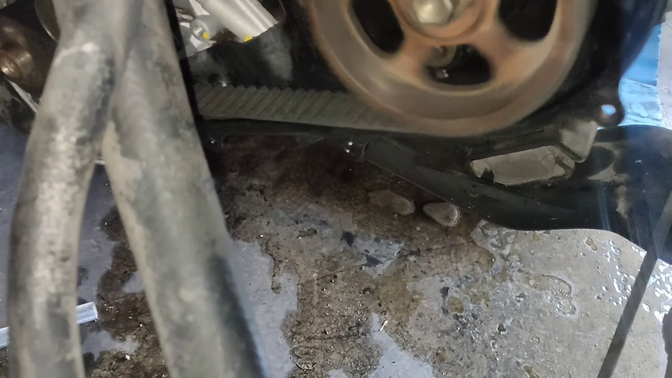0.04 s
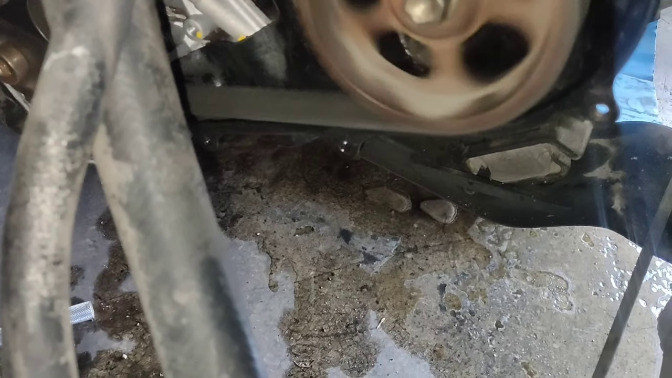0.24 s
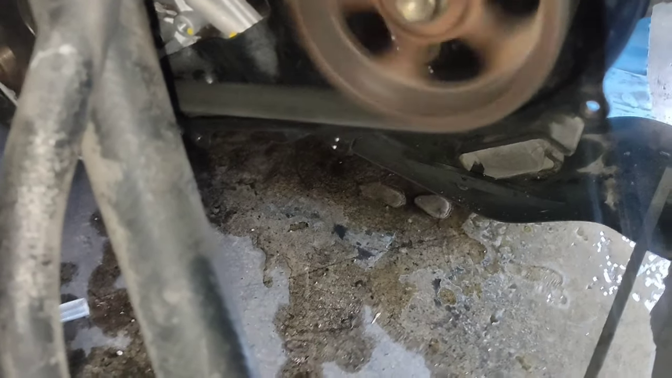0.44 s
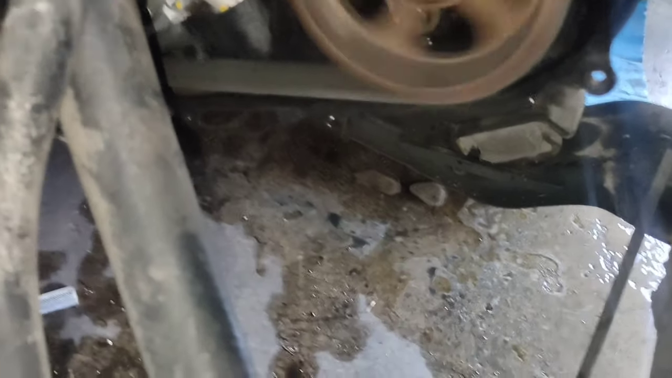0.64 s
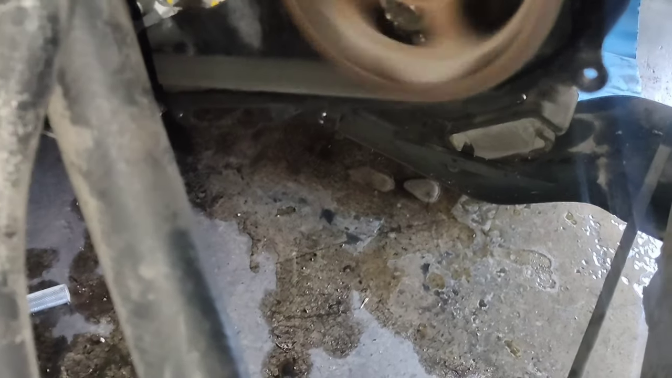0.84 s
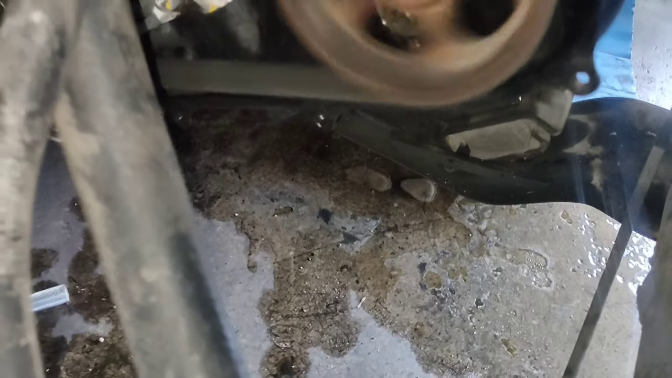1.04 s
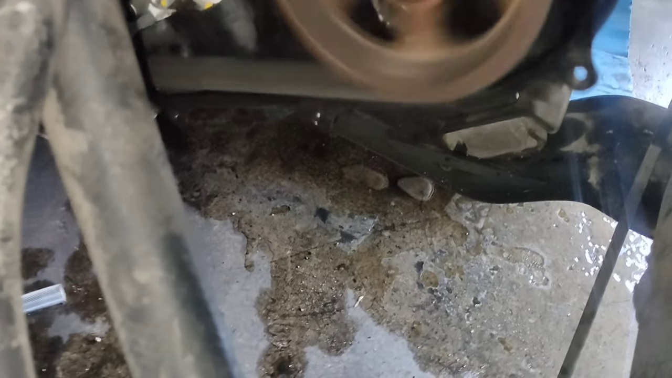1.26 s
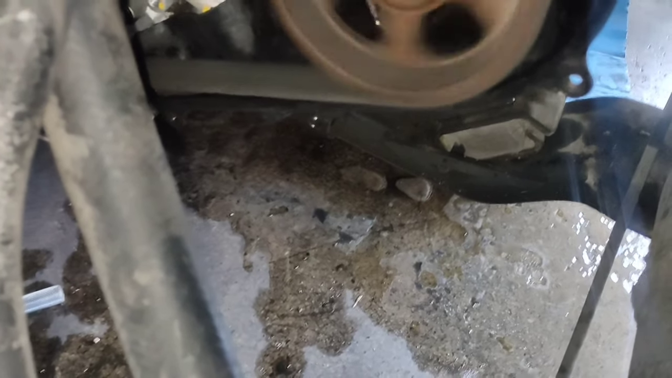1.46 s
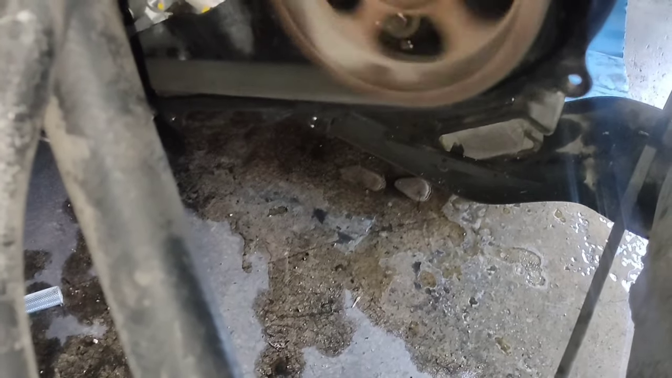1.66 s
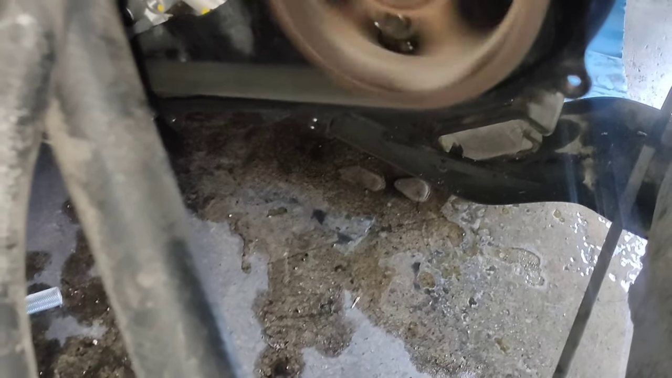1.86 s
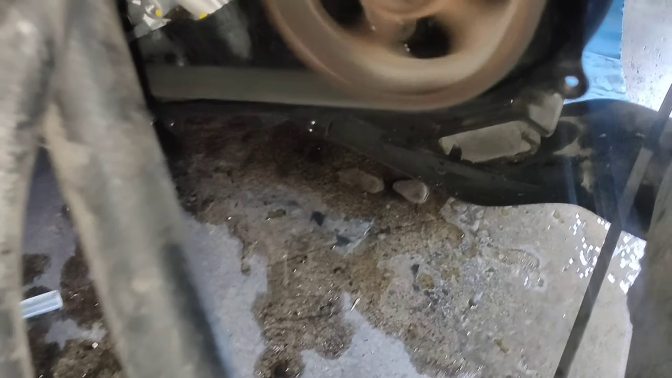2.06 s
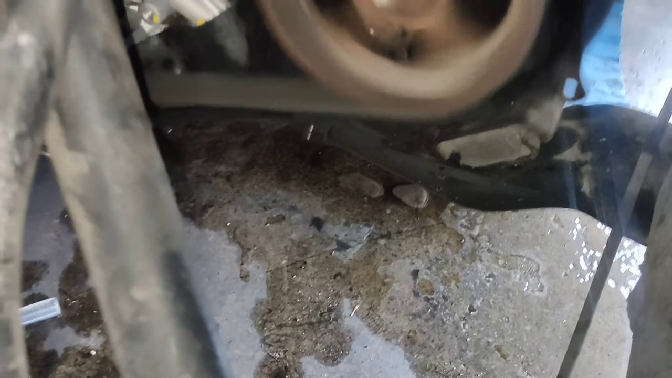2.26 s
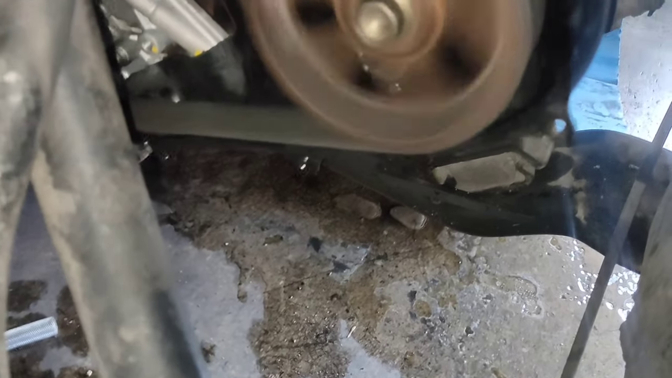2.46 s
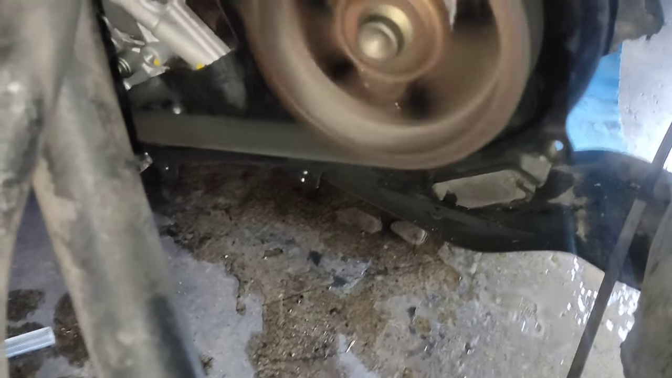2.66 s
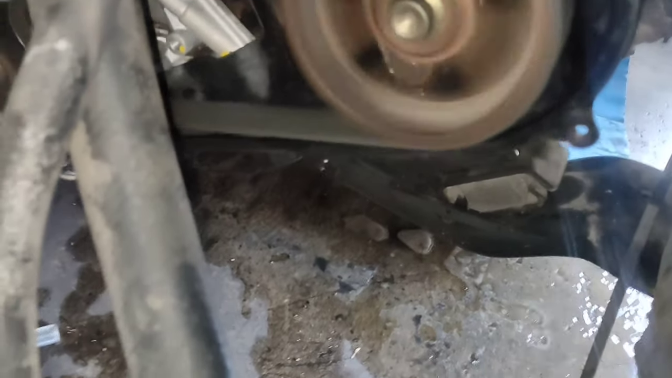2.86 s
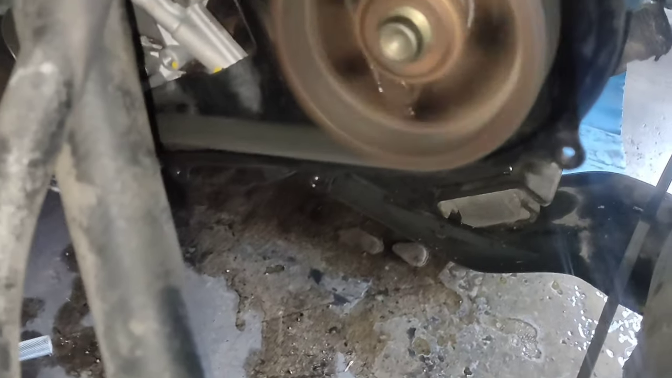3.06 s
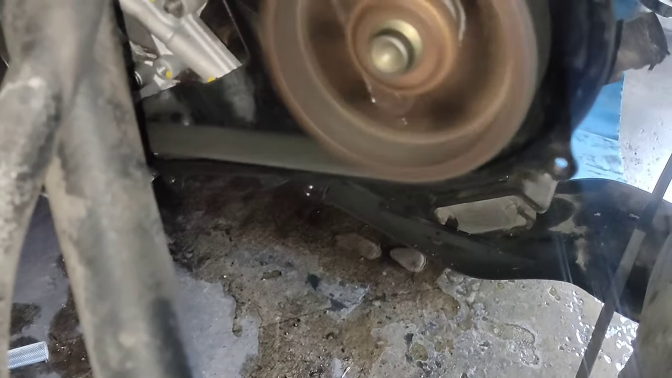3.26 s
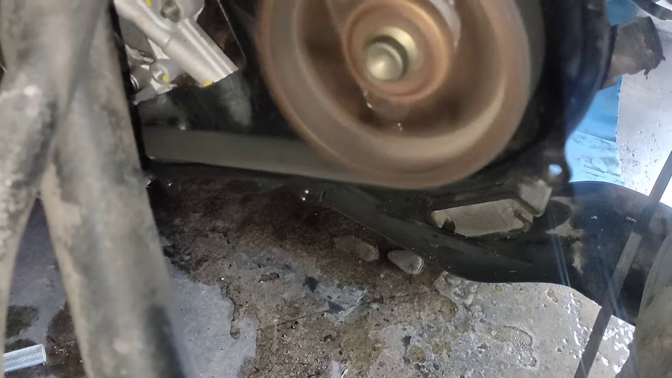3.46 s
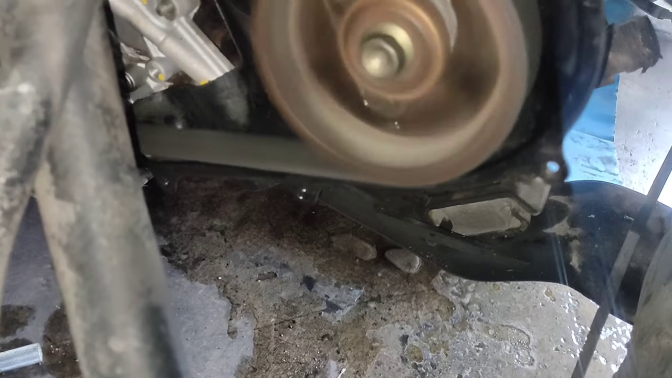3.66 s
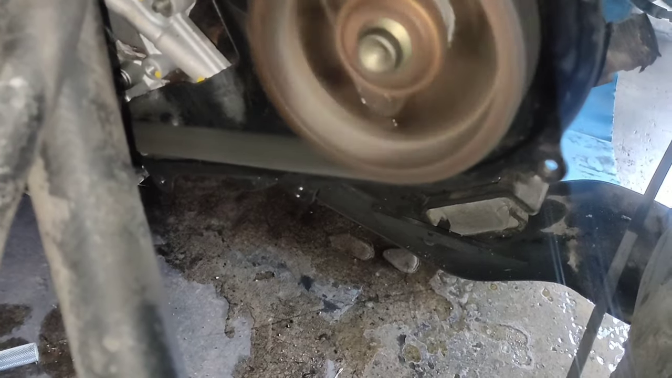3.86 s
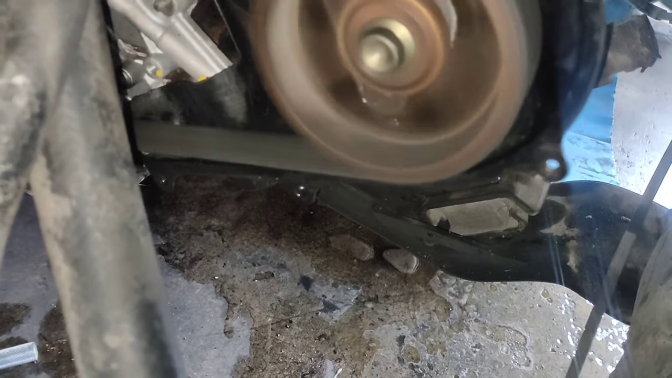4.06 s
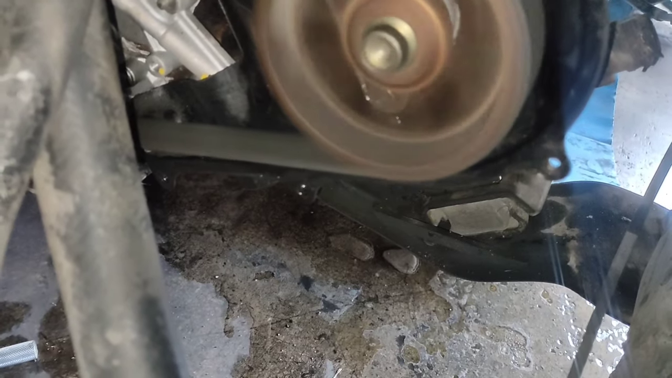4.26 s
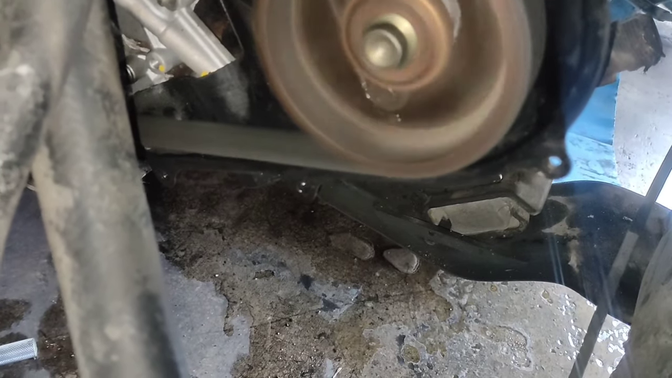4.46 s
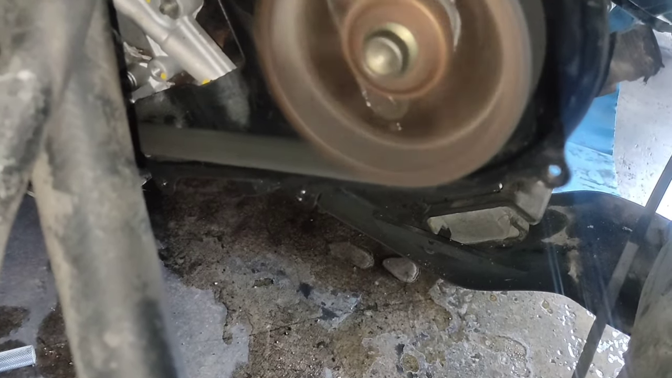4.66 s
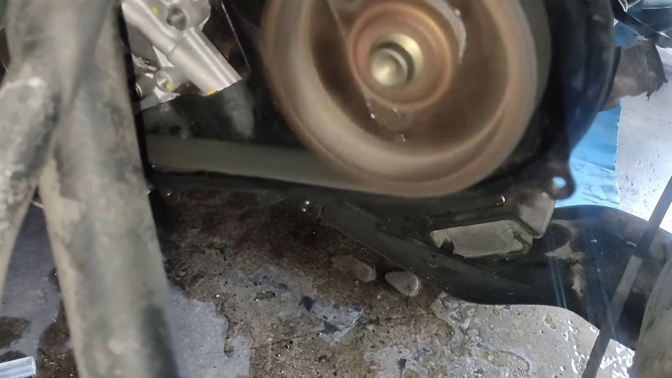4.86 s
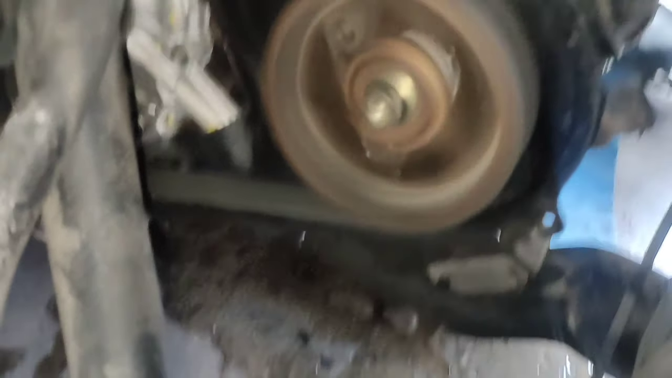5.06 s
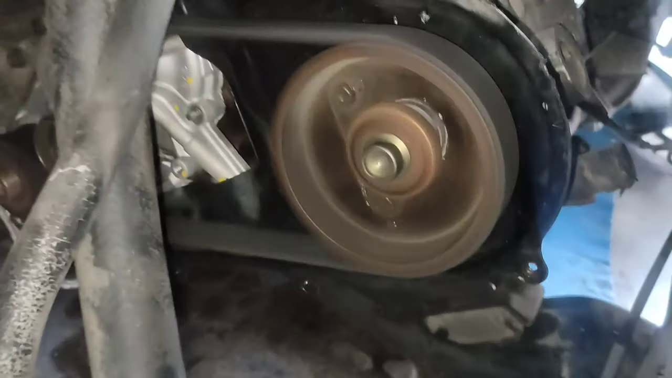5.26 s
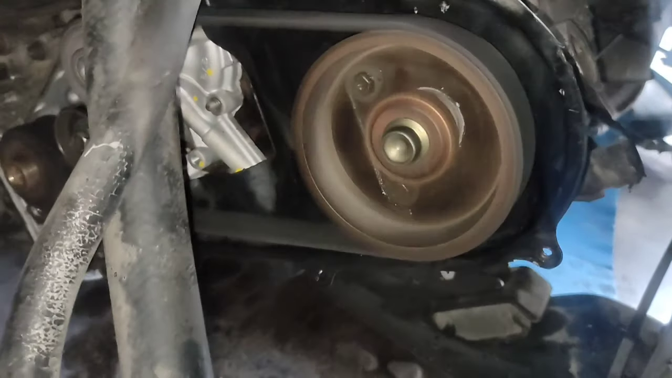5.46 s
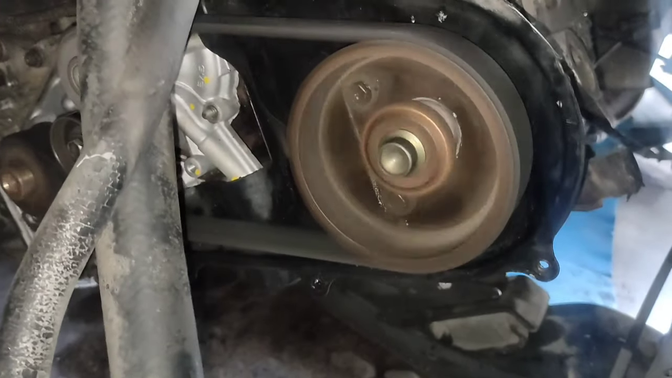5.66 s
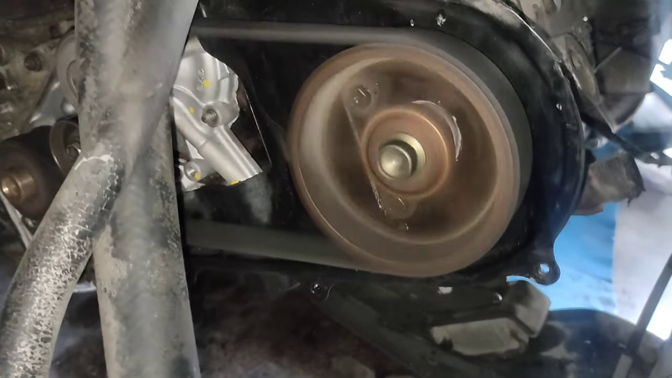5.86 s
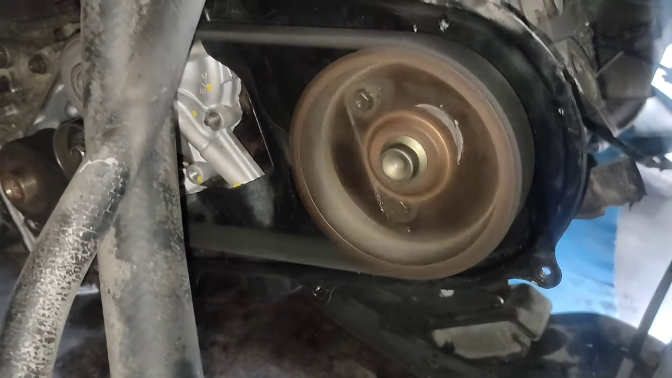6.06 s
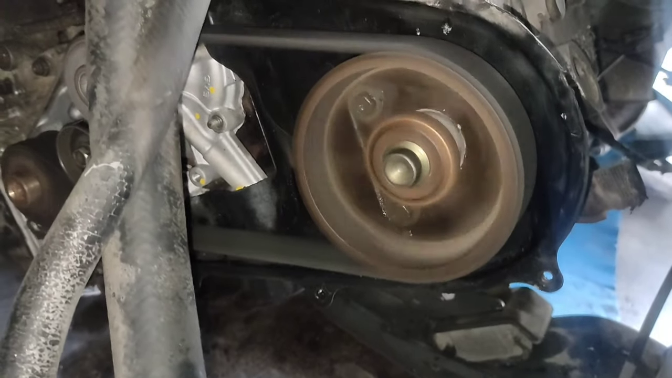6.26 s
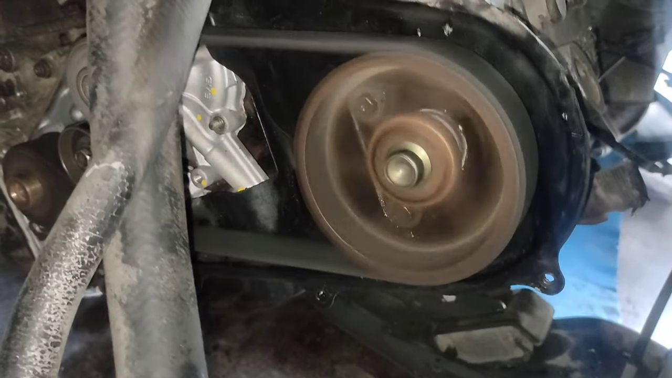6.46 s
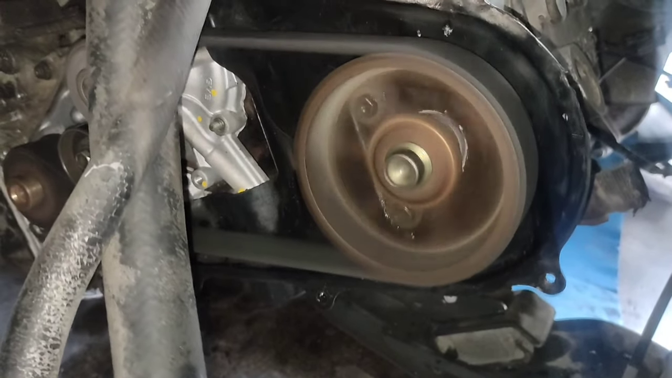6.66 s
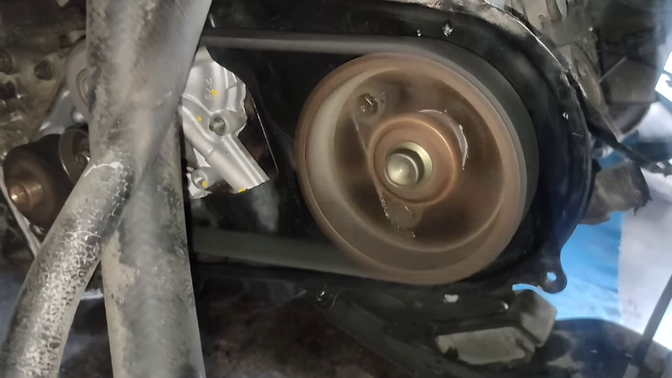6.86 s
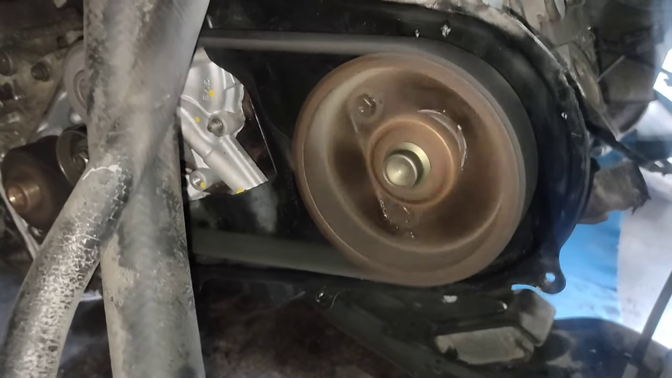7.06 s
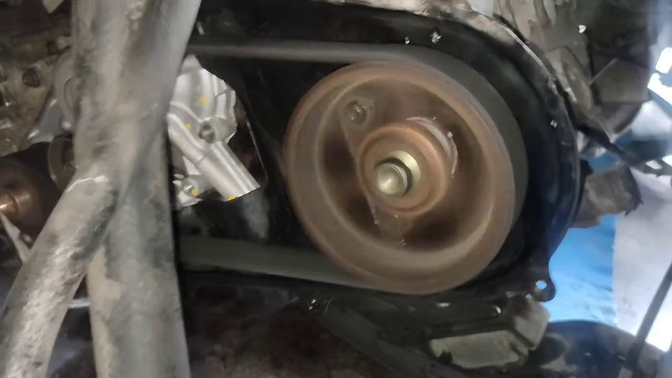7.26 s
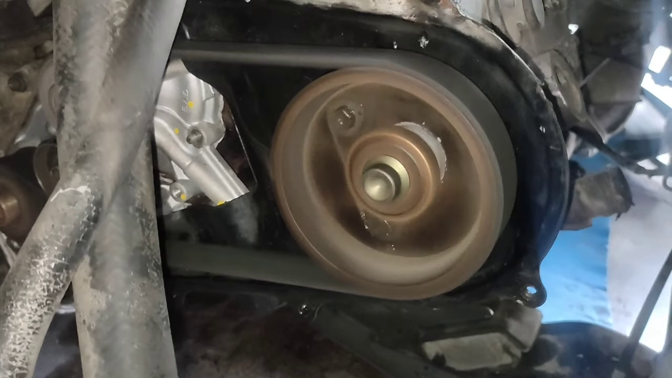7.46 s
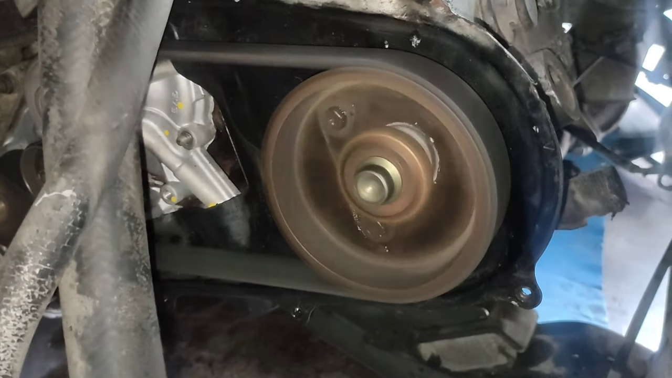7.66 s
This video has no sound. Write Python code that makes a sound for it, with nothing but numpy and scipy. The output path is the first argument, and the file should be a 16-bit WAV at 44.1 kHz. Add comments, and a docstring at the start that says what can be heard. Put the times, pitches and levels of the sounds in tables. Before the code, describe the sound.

Faint workshop air opens the scene, heard in stereo from very near. At 0.15 s a double metallic clank throws the starter pinion in; gears whine upward and squeal until about 0.45 s. From there to 2.37 s the teeth grind in short, uneven bites, raspy and loud, with the flywheel ringing like struck metal, brief rough shrieks around 2.5 kHz and a few isolated jolts. At 2.35 to 2.5 s the pinion rattles out with a tiny high squeak as the small three-cylinder engine catches. It runs slowly and knocking at first, quickening near 3.4 s; one loose tappet cracks loudest around 3.6 to 4.3 s over a busy valve clatter. Near 4.5 s it speeds up again, and a throbbing belt hum around 600 Hz pulses until 6.5 s. Revs climb from 6.7 s to a peak at 7.4 s, with tonal booming, then drop until the end at 7.7 s.

```python
"""A starter pinion slams in, grinds on the ringing flywheel in uneven surges, then lets go with a squeak.
A small three-cylinder engine with its timing cover off picks up: knocks, one loud tappet, a clattering
valve train and a throbbing belt. It stands in a workshop, heard close by on two microphones.
Noise and kicks, timed by gear and camshaft turns, pass through resonances and reflections; sines hum on top."""
import sys
import numpy as np
from scipy import signal
from scipy.fft import rfft, irfft
from scipy.io import wavfile
from scipy.ndimage import uniform_filter1d

SR = 44100
rng = np.random.default_rng(int(sys.argv[2]) if len(sys.argv) > 2 else 0)


def waveform_to_disk(signal):
    """Save audio, clipped to [-1, 1], as 16-bit WAV at the path in sys.argv[1]."""
    frames = np.transpose(np.atleast_2d(signal))
    scaled = np.clip(frames, -1, 1) * 32767
    samples = np.round(scaled).astype(np.int16)
    wavfile.write(sys.argv[1], SR, samples)


N = 340011
TIME = np.arange(N) / SR  # seconds

# All dB in the tables are before the trims in the functions; spectra give shape only.
# Starter effort. Each row: time in seconds, gear grind in dB, rasp of the slack teeth in dB.
STARTER_EFFORT = [(0.19, -28, -55), (0.25, -30.5, -56), (0.29, -23.5, -40), (0.36, -25.5, -37),
                  (0.42, -23, -39.5), (0.455, -27.5, -45), (0.48, -19, -42), (0.59, -19, -36),
                  (0.68, -21, -49), (0.85, -19.5, -38.5), (1.15, -21.5, -35), (1.55, -21, -35.5),
                  (2.0, -21, -38), (2.36, -21.5, -32.5)]
# Ring gear speed. Each row: time in seconds, teeth per second.
TOOTH_RATE = [(0.15, 137), (0.27, 248), (0.30, 288), (0.33, 374), (0.385, 402), (0.44, 387), (0.5, 340),
              (0.6, 413), (1.2, 436), (1.8, 518), (2.37, 408)]
# Pinion blows as it enters and leaves. Each row: start in seconds, level in dB, 60 dB decay in seconds.
CLUNKS = [(0.148, -22, 0.069), (0.164, -15, 0.055), (2.352, -22, 0.057), (2.475, -30, 0.16),
          (2.525, -31, .06)]
# Squeaks as the starter runs down. Each row: time in seconds, level in dB.
SQUEAKS = [(2.503, -23), (2.513, -31)]
# Flywheel modes. Each row: frequency in Hz, width in Hz, level in dB.
FLYWHEEL_MODES = [(350, 22, -8), (591, 2.9, -8.5), (785.3, 7.7, 0.5), (860, 17, -2), (922, 22, -0.5),
                  (1201, 27, -9), (1439, 23, -8.5), (1610, 19, -11), (1790, 40, -10), (2398, 26, -7.5),
                  (2530, 210, -10), (2735, 30, -10), (3000, 90, -15), (4160, 110, -11.5), (6180, 180, -29)]
# Spectrum of the gear housing. Each row: frequency in Hz, density in dB per Hz.
HOUSING_SPECTRUM = [(40, -46), (185, -41), (240, -34), (300, -1), (460, -11.5), (560, 5.5), (900, -1.5),
                    (1100, 4), (2050, -0.5), (2550, 5.5), (3400, -4), (5000, -15), (6600, 0), (9000, -12.5),
                    (15500, -35)]
# Spectrum of the rasping tooth flanks. Each row: frequency in Hz, density in dB per Hz.
RASP_SPECTRUM = [(40, -60), (300, -46), (2000, 4), (4500, 3), (7500, 7.5), (9500, 1.5), (11500, 6.5),
                 (15500, -2.5)]
# Partials of the gear whine. Each row: multiple of the tooth rate, level in dB.
WHINE_PARTIALS = [(1, 6.5), (2, 0), (3, -8.5), (6, -2), (7, -3.5), (8, -1.5)]
# The teeth bite, grind and go slack. Each row: start in seconds, length in seconds, rasp in dB,
# flywheel ring in dB.
BITES = [(0.464, 0.062, -32, -28.5), (0.533, 0.031, -35, -31), (0.604, 0.062, -30.5, -33.5),
         (0.687, 0.028, -30, -36), (0.722, 0.042, -31, -29.5), (0.792, 0.085, -35, -27.5),
         (0.912, 0.054, -32.5, -32.5), (1.001, 0.025, -31.5, -33), (1.028, 0.14, -32, -25.5),
         (1.19, 0.046, -29, -28), (1.255, 0.17, -30, -28), (1.428, 0.037, -29.5, -27.5),
         (1.48, 0.041, -41, -23.5), (1.519, 0.031, -33.5, -27.5), (1.593, 0.05, -32, -26),
         (1.669, 0.048, -30.5, -30.5), (1.742, 0.09, -31.5, -34), (1.833, 0.051, -32.5, -29.5),
         (1.935, 0.082, -32, -31.5), (2.037, 0.083, -32, -26), (2.121, 0.047, -31.5, -24),
         (2.175, 0.024, -31, -28), (2.224, 0.069, -30, -29.5), (2.296, 0.073, -30.5, -26)]
# Squeal bands of the spin-up. Each row: frequency in Hz, width in Hz, level in dB.
SQUEAL_BANDS = [(2434, 71, 2.5), (2760, 350, -4), (6230, 460, -1), (6700, 490, -3.5)]
# Level of that squeal. Each row: time in seconds, level in dB.
SQUEAL_LEVEL = [(0.2, -73), (0.25, -48), (0.29, -32), (0.39, -26.5), (0.46, -34), (0.52, -51)]
# The flanks shriek under load. Each row: peak time in seconds, length in seconds, frequency in Hz
# at the peak, level in dB.
SHRIEKS = [(0.63, 0.07, 2620, -21.5), (0.757, 0.059, 2580, -24), (0.935, 0.06, 2560, -23.5),
           (1.039, 0.035, 2520, -22), (1.223, 0.032, 2700, -23), (1.295, 0.058, 2700, -23.5),
           (1.436, 0.026, 2450, -27), (1.54, 0.043, 2650, -31), (1.624, 0.04, 2700, -29),
           (1.7, 0.045, 2700, -27), (1.787, 0.029, 2450, -22), (1.849, 0.059, 2600, -31),
           (2.06, 0.035, 2700, -28), (2.131, 0.025, 2700, -31), (2.19, 0.022, 2420, -28),
           (2.299, 0.09, 2380, -24)]
# Strands of a shriek. Each row: share of its pitch, level in dB.
SHRIEK_STRANDS = [(0.44, -6.5), (0.92, -1), (1, 6), (1.129, -7)]
# Single firings jolt the flywheel before the engine catches. Each row: time in seconds, level in dB.
JOLTS = [(0.423, -21), (0.496, -20.5), (0.545, -23), (1.335, -19.5), (1.852, -21), (1.955, -25)]
# Running speed. Each row: time in seconds, engine cycles (camshaft turns) per second.
ENGINE_SPEED = [(2.4, 7.421), (2.9, 8.905), (3.25, 9.14), (3.5, 10.861), (4.33, 10.731), (4.76, 13.464),
                (5.9, 13.113), (6.7, 14.16), (7.12, 15.6), (7.31, 15.95), (7.38, 16.35), (7.45, 16.0),
                (7.6, 13.9), (7.71, 13.0)]
# Firings of one cycle. Each row: share of the turn, level in dB.
FIRINGS = [(0.03, 0.5), (0.363, -3), (0.697, -3.5)]
# Tappet contacts of one cycle, the loose one first. Each row: share of the turn, level in dB.
TAPPETS = [(0.96, 3.5), (0.325, -1.5), (0.675, 1.5)]
# The loose tappet. Each row: time in seconds, extra level in dB.
LOOSE_TAPPET = [(2.4, -1), (3.3, 5), (3.49, 5.5), (3.6, 7), (3.76, 10), (3.86, 7.5), (4.04, 8.5),
                (4.14, 10), (4.23, 11.5), (4.32, 7.5), (4.55, 4), (4.7, 2.5), (5.18, 4.5), (5.26, 8),
                (5.34, 1.5), (5.7, 4), (5.8, 7), (6.02, 3), (6.4, 2.5), (6.6, -3), (7.3, 2.5), (7.7, -10)]
# Growth of block, clatter and tappets, in that order. Each row: level at idle in dB, dB per doubling of
# speed, dB added at full throttle, dB added as the engine catches.
LOUDNESS = [(-42, 3, 0.5, 2), (-35.5, 6, -0.05, 2), (-41, 16.5, 1.5, 10)]
# Spectrum of the block. Each row: frequency in Hz, density in dB per Hz.
BLOCK_SPECTRUM = [(40, -45), (130, -67), (190, -43), (240, -18.5), (290, 0), (350, 8.5), (430, -4.5),
                  (510, 6.5), (600, 9), (690, 1), (790, 6.5), (920, 5), (1100, -16), (3000, -38),
                  (15500, -58)]
# Block modes that the firings knock on. Each row: frequency in Hz, width in Hz, level in dB.
BLOCK_MODES = [(291.7, 4.5, -14.5), (383, 9, -13), (518, 12, -6.5), (559, 7.6, -10), (698, 11, -11),
               (785, 9.8, -14.5), (911, 17, -8), (1056, 56, -10), (1255, 70, -10), (1420, 33, -16),
               (1643, 41, -12), (1787, 25, -12)]
# Spectrum of the cylinder head. Each row: frequency in Hz, density in dB per Hz.
HEAD_SPECTRUM = [(40, -78), (250, -44), (600, -2), (1050, -2), (1420, 3.5), (1600, 1), (1800, 2),
                 (2080, -2), (2650, -1), (3600, -8), (5000, -14.5), (6800, -6.5), (9000, -12),
                 (15500, -17.5)]
# Spectrum of the ringing tappets. Each row: frequency in Hz, density in dB per Hz.
TAPPET_SPECTRUM = [(40, -58), (1000, 1.5), (3000, 1.5), (5000, -8), (7000, 7), (9300, -3), (10600, 0),
                   (11400, 1.5), (12400, -4.5), (15500, -4)]
# Spectrum of a tappet's first crack. Each row: frequency in Hz, density in dB per Hz.
CRACK_SPECTRUM = [(40, -70), (2000, 1), (5000, -7.5), (7000, -0.5), (9500, -4), (11400, 6), (13000, -3),
                  (15500, -2.5)]
# How hard the belt flaps. Each row: time in seconds, level in dB.
BELT_LEVEL = [(4.25, -58), (4.44, -33), (4.56, -29.5), (4.64, -27), (4.75, -26.5), (5.1, -24.5), (5.6, -26),
              (6.25, -25.5), (6.44, -26.5), (6.54, -36.5), (6.7, -49), (7.0, -55)]
# Harmonics that boom as the revs change. One multiple of the cycle rate for each row of BOOMS.
BOOM_ORDERS = [18, 32, 44, 48, 45]
# When they boom. Each row: start in seconds, end in seconds, level in dB.
BOOMS = [(7.1, 7.56, -45), (7.04, 7.22, -36), (6.55, 7.42, -34.5), (7.28, 8.3, -34), (7.42, 7.7, -35)]
# Dull thuds. Each row: start in seconds, level in dB.
THUDS = [(0.155, -59), (0.745, -59), (1.435, -57), (2.338, -54), (2.47, -60), (2.52, -61), (3.74, -66)]
# Spectrum of the workshop air. Each row: frequency in Hz, density in dB per Hz.
AIR_SPECTRUM = [(24, -65), (40, -32), (129, -56), (309, -0.5), (449, -12), (606, -0.5), (722, -8.5),
                (2570, -5), (4130, -16.5), (6640, -11), (15500, -28)]
# Level of the workshop air. Each row: time in seconds, level in dB.
AIR_LEVEL = [(0, -35.5), (0.06, -40.5), (0.13, -44), (7.71, -41.5)]
# Width between the two microphones. Each row: frequency in Hz, side over mid in dB.
STEREO_WIDTH = [(60, -5), (92, -1), (140, -2), (210, -20), (330, -6), (500, -8), (770, -4), (1170, 3),
                (1790, 0.5), (2740, -0.5), (4190, -1), (6410, 1), (9810, -0.5), (15000, 0.5)]
# Place of the starter before the microphones. Each row: frequency in Hz, left over right in dB.
STARTER_PAN = [(60, 1.0), (92, 9), (140, -1), (210, -0.5), (330, 5), (500, -12), (770, -4.5), (1170, -5),
               (1790, 0.5), (2740, 2.0), (4190, 6), (6410, 2.5), (9810, -5.5), (15000, 11.5)]
# Place of the engine before the microphones. Each row: frequency in Hz, left over right in dB.
ENGINE_PAN = [(60, 1.5), (92, 2.0), (140, 0.0), (210, -6), (330, 7.5), (500, -7.5), (770, 3.5),
              (1170, -0.5), (1790, 2.5), (2740, 3), (4190, 4.5), (6410, 7), (9810, -2.5), (15000, 10.5)]

# The gears whine cleanly while they spin up and less once the engine kicks.
WHINE_DB, WHINE_LOSS_DB, WHINE_BREAKS_S, WHINE_FADE_S, WHINE_PAN_DB = -6, 23.5, 0.44, 0.03, 1.5
# The pinion runs out of true, so the teeth chatter once in each of its turns.
PINION_TEETH, CHATTER_DB, CHATTER_CHANCE_DB = 11, 0.2, 1.0
BITE_ATTACK_S, BITE_RELEASE_S, BITE_SAG_DB_PER_S = 0.0042, 0.012, 37
# The housing roars with the bites: its load when slack, and the rasp that doubles its power.
SLACK_DB, FIRM_BITE_DB = -4.5, -36
SHRIEK_SAG_HZ_PER_S = 3300  # pitch falls as the motor is dragged down
JOLT_T60_S = 0.15
CATCH_S, CATCH_TURN = 2.4, -.585  # the camshaft starts to turn here, at this position in turns
IDLE_CYCLES_PER_S, FULL_THROTTLE_CYCLES_PER_S2 = 13.3, 6.4
FLARE_AT_S, FLARE_S = 2.48, 0.17
BLOCK_LOWEST_HZ = 261  # little of the block's ringing is heard below this
# The belt span sings cleanly near its own pitch; a share of the hum lasts between flaps.
PULLEY_TEETH, BELT_HZ, BELT_WIDTH_HZ, BELT_REST = 44, 614, 20.6, 0.27
BOOM_FADE_S, BOOM_DB_PER_DOUBLING, BOOM_CYCLES_PER_S = 0.073, 33, 16.4
THUD_T60_S, THUD_HZ = 0.11, 90
CUTOFF_HZ = 15700


def starter(whine_db_per_doubling=6, wobble=.018, tooth_spread_db=4.5, strike=0.59, grit_db=2.5,
            ring_db=0.5, grind_db=-0.36, rasp_db=7.5, whine_flutter_db=2.5):
    """Pinion teeth strike and scrape the ring gear; the flywheel rings and the housing roars."""
    grind, rasp = in_time(STARTER_EFFORT)
    bite = bites()
    engaged = np.interp(TIME, [.15, .2, 2.362, 2.378], [0, 1, 1, 0])
    rate, = in_time(TOOTH_RATE)
    mesh = np.cumsum(rate * (1 + wobble * drift(40))) / SR  # teeth passed so far

    at = passes(mesh)
    teeth = np.zeros((2, N))
    teeth[:, at] = from_db(tooth_spread_db * rng.standard_normal((2, len(at))))
    rubbing = rms_one(hiss() * from_db(grit_db * drift(500)))
    force = rms_one(strike * rms_one(teeth) + rubbing)

    chatter_db = CHATTER_DB * np.sin(2 * np.pi * mesh / PINION_TEETH) + CHATTER_CHANCE_DB * drift(150)
    touching = engaged * from_db(chatter_db)
    biting_load = from_db(SLACK_DB) * np.hypot(1, bite / from_db(FIRM_BITE_DB))
    load = np.where(TIME < BITES[0][0], 1, biting_load)
    housing = radiate(force * touching * load * from_db(grind + grind_db), HOUSING_SPECTRUM, STARTER_PAN)
    scrape = force * touching * np.hypot(from_db(rasp), bite) * from_db(rasp_db)
    flanks = radiate(scrape, RASP_SPECTRUM, STARTER_PAN)

    whine_db = grind + WHINE_DB + whine_db_per_doubling * np.log2(rate / rate.max())
    whine_db = whine_db - WHINE_LOSS_DB * np.clip((TIME - WHINE_BREAKS_S) / WHINE_FADE_S, 0, 1)
    whine = 0
    for order, db in WHINE_PARTIALS:
        level = from_db(db + whine_flutter_db * drift(70)) * gain_at(HOUSING_SPECTRUM, order * rate)
        whine = whine + level * wavering(order * mesh, 0.24 * np.sqrt(order))
    whine = whine * touching * from_db(whine_db) * from_db(WHINE_PAN_DB * np.array([[.5], [-.5]]))

    ring_drive = np.sqrt(touching * load) * ringing(grind) * from_db(ring_db)
    return housing + flanks + whine + squeal(force) + shrieks() + flywheel(ring_drive)


def bites():
    """Rasp of the loaded teeth: each bite starts sharply, sags and lets go."""
    level = 0
    for start, length, db, _ in BITES:
        end = start + length
        top, sagged = from_db(db), from_db(db - BITE_SAG_DB_PER_S * length)
        level = level + np.interp(TIME, [start, start + BITE_ATTACK_S, end, end + BITE_RELEASE_S],
                                  [0, top, sagged, 0])
    return level


def ringing(grind, spin_up_db=-5.5, settle_s=0.037):
    """How hard the flywheel is rung: with the grind at first, then anew by each bite, and by the jolts."""
    start, _, _, ring = np.transpose(BITES)
    bite = np.searchsorted(start, TIME) - 1
    db = np.where(bite < 0, grind + spin_up_db, ring[bite])
    db = uniform_filter1d(db, size=int(settle_s * SR) + 1)
    return np.hypot(from_db(db), sum(burst(at, level, JOLT_T60_S) for at, level in JOLTS))


def flywheel(drive, spread=1.0):
    """Uneven tooth blows keep the modes ringing; each microphone hears them a little differently."""
    blows = (rng.standard_normal(N) + spread * hiss()) * drive / np.hypot(1, spread)
    rings = 0
    for k, (hz, width, db) in enumerate(FLYWHEEL_MODES):
        mode_gain = from_db(db) * np.sqrt(SR / np.pi / width) * (-1) ** k  # narrow modes keep their power
        rings = rings + mode_gain * resonate(blows, hz, width)
    return from_db(-1.5) * signal.sosfilt(signal.butter(6, 290, "high", fs=SR, output="sos"), rings)


def squeal(force, broken_db=2.5):
    """While the motor spins up, the rubbing teeth squeal in a few broad, breaking bands."""
    bands = 0
    for hz, width, db in SQUEAL_BANDS:
        band = rms_one(resonate(resonate(force, hz, width), hz, width))
        bands = bands + from_db(db + broken_db * drift(70.0)) * band
    return bands * from_db(in_time(SQUEAL_LEVEL)[0]) * (TIME < BITES[1][0])


def shrieks(rough=0.62):
    """Short, rough squeals of the loaded teeth swell, sag in pitch and fade, each in several strands."""
    peak, length, hz, db = np.transpose(SHRIEKS)
    nearest = np.searchsorted((peak[1:] + peak[:-1]) / 2, TIME)
    age = np.clip(TIME - peak[nearest], -length[nearest] / 2, length[nearest] / 2)
    level = from_db(db[nearest]) * np.cos(np.pi * age / length[nearest])
    cycles = np.cumsum(hz[nearest] - SHRIEK_SAG_HZ_PER_S * age) / SR
    strands = sum(from_db(strand_db) * wavering(share * cycles, rough * share)
                  for share, strand_db in SHRIEK_STRANDS)
    return level * rms_one(strands) * from_db(2 * drift(400))


def pinion(squeak_hz=6600, squeak_width=90, squeak_s=0.0028, bright_db=-1.0):
    """The solenoid throws the pinion in with a double clank; it leaves with a rattle and a squeak."""
    blows = hiss() * sum(burst(start, db, t60) for start, db, t60 in CLUNKS)
    clank = radiate(blows, HOUSING_SPECTRUM, STARTER_PAN)
    clank = clank + from_db(bright_db) * radiate(blows, RASP_SPECTRUM, STARTER_PAN)
    slips = sum(from_db(db) * np.interp(TIME, [s - .001, s + .001, s + squeak_s], [0, 1, 0])
                for s, db in SQUEAKS)
    squeak = resonate(slips * np.sin(2 * np.pi * squeak_hz * TIME), squeak_hz, squeak_width)
    return clank + from_db(15.5) * squeak


def engine(knock_t60=0.1, rumble=1.0, block_db=8.5, whirr=0.72, firing_share=0.54, clatter_db=5.5,
           tick_t60=0.1, sizzle=0.54, tappet_db=7.0, crack_t60=0.026, crack_db=11.0):
    """Firings shake the block, valve parts clatter, tappets crack and ring, all locked to the camshaft."""
    speed, = in_time(ENGINE_SPEED)
    block, clatter, tappet = running_levels(speed)
    turn = np.cumsum(speed * (TIME > CATCH_S)) / SR + CATCH_TURN
    running = np.interp(TIME, [2.33, 2.39], [0, 1])

    firing = dying(contacts(turn, FIRINGS, spread_db=2.5), knock_t60)
    knocks = rms_one(rms_one(hiss() * (firing + rumble)) + 0.5 * valve_train(turn))
    parts = rms_one(valve_train(turn) * 0.58 + hiss() * (whirr + firing_share * firing))

    loose = contacts(turn, TAPPETS[:1], spread_db=1.9) * from_db(in_time(LOOSE_TAPPET)[0])
    taps = loose + contacts(turn, TAPPETS[1:], spread_db=2.0)
    ticks = rms_one(hiss() * (dying(taps, tick_t60) + sizzle * from_db(1.3 * drift(200))))
    cracks = hiss() * dying(taps, crack_t60)

    return (radiate(knocks * running * from_db(block + block_db), BLOCK_SPECTRUM, ENGINE_PAN)
            + block_rings(turn) * from_db(block)
            + radiate(parts * running * from_db(clatter + clatter_db), HEAD_SPECTRUM, ENGINE_PAN)
            + radiate(ticks * running * from_db(tappet + tappet_db), TAPPET_SPECTRUM, ENGINE_PAN,
                      bay_t60=0.023, room_db=-28.0)
            + radiate(cracks * from_db(tappet + crack_db), CRACK_SPECTRUM, ENGINE_PAN,
                      bay_t60=0.019, room_db=-30)
            + belt(turn, speed) * running
            + boom(turn, speed))


def running_levels(speed):
    """Level in dB of block, clatter and tappets, from speed, throttle and the flare of the first firings."""
    throttle = throttle_for(speed)
    flare_width = np.where(TIME < FLARE_AT_S, FLARE_S, 2 * FLARE_S)
    flare = np.exp(-((TIME - FLARE_AT_S) / flare_width) ** 2)
    doublings = np.log2(speed / IDLE_CYCLES_PER_S)
    return [idle + by_speed * doublings + by_throttle * throttle + by_flare * flare
            for idle, by_speed, by_throttle, by_flare in LOUDNESS]


def throttle_for(speed):
    """Throttle from -1 (shut) to 1 (full), read from how fast the engine gains speed."""
    gain_of_speed = uniform_filter1d(np.gradient(speed) * SR, size=4000)
    return np.clip(gain_of_speed / FULL_THROTTLE_CYCLES_PER_S2, -1, 1)


def contacts(turn, table, spread_db):
    """One kick per row and cycle, never quite equally strong."""
    kicks = np.zeros(N)
    for angle, db in table:
        at = passes(turn - angle)
        kicks[at] += from_db(db + spread_db * rng.standard_normal(len(at)))
    return kicks


def block_rings(turn, spread_db=3.5, own=0.19):
    """Firings knock on the block's modes; each sings out when a firing harmonic passes through it."""
    out = 0
    for hz, width, db in BLOCK_MODES:
        shared, left, right = [resonate(contacts(turn - shift, FIRINGS, spread_db), hz, width)
                               for shift in (0, .004, .009)]
        ring = rms_one(shared + own * np.array([left, right]))
        out = out + from_db(db) * ring * gain_at(ENGINE_PAN, hz) ** np.array([[.5], [-.5]])
    return signal.sosfilt(signal.butter(10, BLOCK_LOWEST_HZ, "high", fs=SR, output="sos"), out)


def valve_train(turn, count=45):
    """Many small parts touch at the same cam angles on every turn, in front and off to the sides."""
    return rms_one(np.array([contacts(turn, zip(rng.random(count), rng.normal(0, 3.2, count)), spread_db=2.5)
                             for _ in range(2)]))


def belt(turn, speed, flap_at=0.16, flap_width=0.22, stretch=0.5, slip=0.12, thump_order=26,
         thump_db=-13, thump_lead=0.14, clean=0.05, rough=0.34):
    """The cam pulley's teeth hum on a belt flapping once a turn; off the span's pitch the hum breaks up."""
    near = 1 / np.sqrt(1 + ((PULLEY_TEETH * speed - BELT_HZ) / BELT_WIDTH_HZ) ** 4)
    from_flap = (turn - flap_at + .5) % 1 - .5
    flap = np.exp(-abs(from_flap / flap_width) ** 4)
    # the pulley speeds up during the flap, so the hum is a little sharp there; no two flaps are quite in step
    sharpening = stretch * np.sin(2 * np.pi * from_flap) / (2 * np.pi)
    cycles = PULLEY_TEETH * turn + sharpening + slip * drift(5)
    hum = wavering(cycles, clean + rough * (1 - near) ** 2) * (BELT_REST + (1 - BELT_REST) * flap)
    thump_swell = np.exp(-(np.sin(np.pi * (from_flap + thump_lead)) / np.pi / flap_width) ** 2)
    thump = wavering(thump_order * turn, 0.18) * thump_swell
    level = from_db(in_time(BELT_LEVEL)[0] + drift(15) / 2)
    return (hum + from_db(thump_db) * thump) * level * from_db([[-.7], [.7]])


def boom(turn, speed, rough_per_order=0.0039):
    """Harmonics of the cycle swell and fade as the revs climb and drop, louder at higher speed."""
    tones = 0
    for order, (start, end, db) in zip(BOOM_ORDERS, BOOMS):
        swell = np.interp(TIME, [start, start + BOOM_FADE_S, end - BOOM_FADE_S, end], [0, 1, 1, 0])
        tones = tones + from_db(db) * swell * wavering(order * turn, rough_per_order * order)
    return tones * from_db(BOOM_DB_PER_DOUBLING * np.log2(speed / BOOM_CYCLES_PER_S))


def thuds():
    """Faint, dull low thuds, as when loud moments overload the microphone: bursts of lowpassed noise."""
    level = sum(burst(start, db, THUD_T60_S) for start, db in THUDS)
    lowpass = signal.butter(2, THUD_HZ, fs=SR, output="sos")
    return level * rms_one(signal.sosfilt(lowpass, rng.standard_normal(N)))


def workshop_air():
    """Noise of the place, which fades quickly at first and then stays nearly even."""
    return radiate(hiss() * from_db(in_time(AIR_LEVEL)[0]), AIR_SPECTRUM, ENGINE_PAN)


def radiate(force, spectrum, pan, bay_t60=0.026, room_t60=0.14, room_db=-19, sway=1.42, sway_per_s=7,
            size=16384):
    """A force sounds through a metal part, close reflections in the engine bay and the workshop; stereo.
    The reflections shift as the engine rocks and the microphones move."""
    t, hz, lead = np.arange(size) / SR, np.arange(size // 2 + 1) * SR / size, size // 16
    sides, width = np.array([[1], [-1]]), gain_at(STEREO_WIDTH, hz)
    colour = gain_at(spectrum, hz) * gain_at(pan, hz) ** (sides / 2) / np.hypot(1, width)
    decay = from_db(-60 * t / bay_t60) + from_db(room_db - 60 * t / room_t60)
    out, angle = 0, sway * drift(sway_per_s)  # blends two sets of reflections
    for share in (np.cos(angle), np.sin(angle)):
        echoes = rfft(rng.standard_normal((2, size)) * decay)
        # levelled, so that reflections add no broad colour
        mid, side = echoes / np.sqrt(uniform_filter1d(abs(echoes) ** 2, size=50, axis=1))
        paths = irfft(np.array([colour * mid, colour * side * width * sides]))
        paths = np.roll(paths, lead, axis=2) * signal.windows.tukey(size, 2 * lead / size)
        paths = rms_one(paths) / np.sqrt(2 * size)
        heard = signal.oaconvolve(force[:, None], paths, axes=2).sum(axis=0)
        out = out + share * heard[:, lead:lead + N]
    return out


def resonate(x, hz, width):
    """One resonance with gain 1 on top."""
    r = np.exp(-np.pi * width / SR)
    zeros = np.array([1, 0, -1]) * (1 - r * r) / 2
    return signal.lfilter(zeros, [1, -2 * r * np.cos(2 * np.pi * hz / SR), r * r], x + 1e-18)


def wavering(cycles, rough):
    """A tone of unit power whose phase trembles, a little differently at each microphone."""
    return np.sqrt(2) * np.sin(2 * np.pi * cycles + 2 * rough * np.array([drift(90), drift(90)]))


def burst(start, db, t60):
    """Level that jumps up at the start and dies away exponentially."""
    return from_db(db - 60 * np.maximum(TIME - start, 0) / t60) * (TIME >= start)


def dying(kicks, t60):
    """Every kick dies away exponentially."""
    return signal.lfilter([1], [1, -from_db(-60 / (t60 * SR))], kicks + 1e-18)


def passes(turn):
    """Samples at which a rotation completes a turn."""
    return np.flatnonzero(np.diff(np.floor(turn)) > 0)


def hiss():
    """Two unrelated white noises: surfaces that face the microphones and surfaces off to the sides."""
    return rng.standard_normal((2, N))


def drift(rate):
    """Smooth chance with unit power, from random knots at this rate per second."""
    knots = rng.standard_normal(int(N / SR * rate) + 2)
    return rms_one(np.interp(TIME * rate, np.arange(len(knots)), knots))


def in_time(rows):
    """Each column of a curve at every sample."""
    s, *columns = np.transpose(rows)
    return [np.interp(TIME, s, c) for c in columns]


def gain_at(points, hz):
    """Gain of a spectrum, read on a log-frequency axis."""
    f, db = np.transpose(points)
    return from_db(np.interp(np.log(hz + 1), np.log(f), db))


def rms_one(x):
    """Scale to unit power."""
    return x / np.sqrt(np.mean(x ** 2) + 1e-20)


def from_db(db):
    """Decibels to gain."""
    return 10 ** (np.asarray(db) / 20)


def scene():
    """Starter and engine close by, over the air of the workshop."""
    return starter() + pinion() + engine() + thuds() + workshop_air()


def record(dry):
    """The top is cut steeply."""
    return signal.sosfilt(signal.ellip(10, .2, 80, CUTOFF_HZ, fs=SR, output="sos"), dry)


dry = scene()
out = record(dry)
waveform_to_disk(out)
```